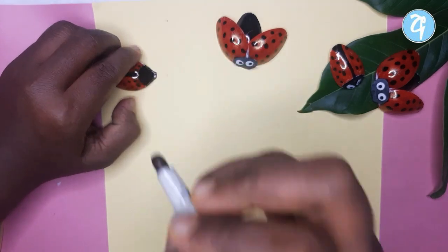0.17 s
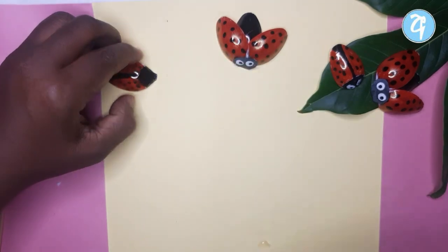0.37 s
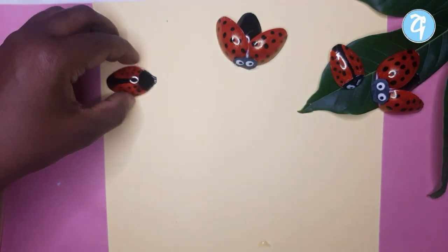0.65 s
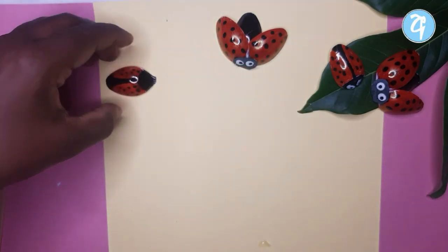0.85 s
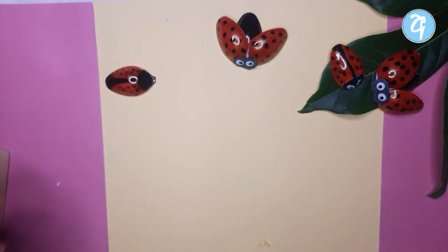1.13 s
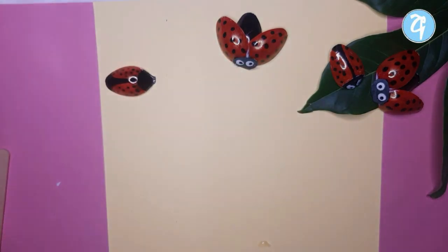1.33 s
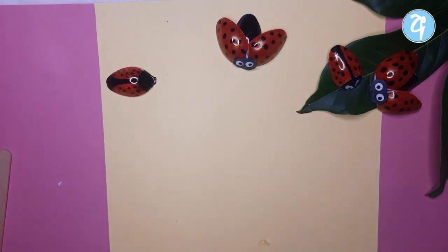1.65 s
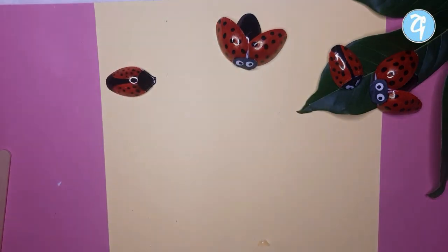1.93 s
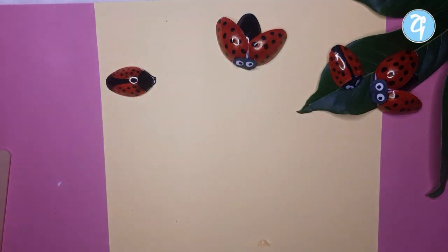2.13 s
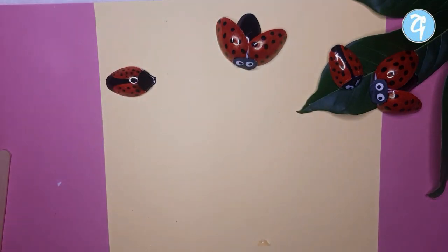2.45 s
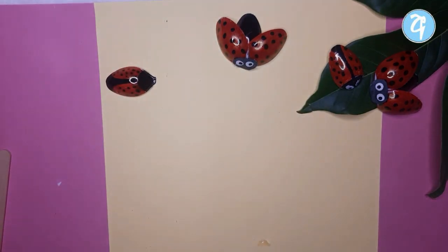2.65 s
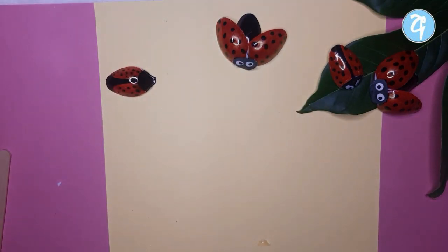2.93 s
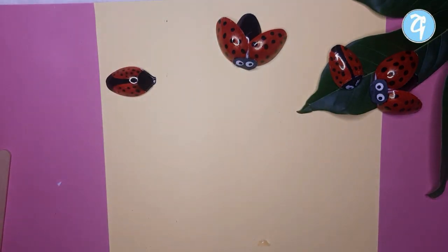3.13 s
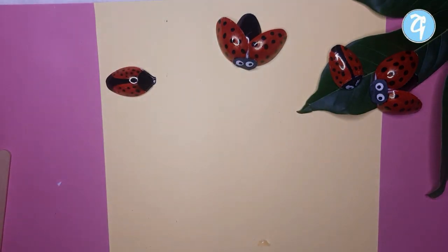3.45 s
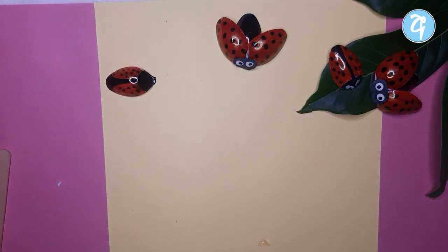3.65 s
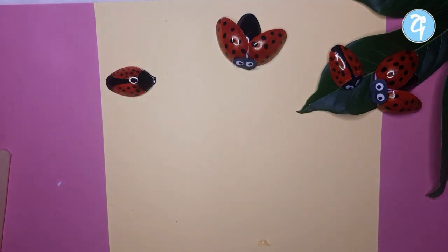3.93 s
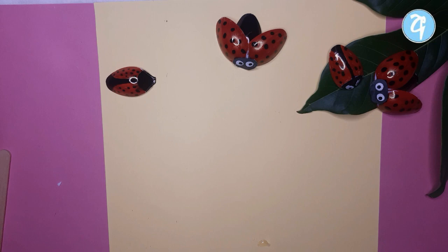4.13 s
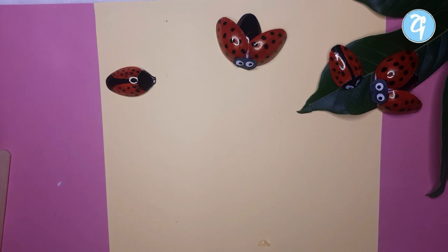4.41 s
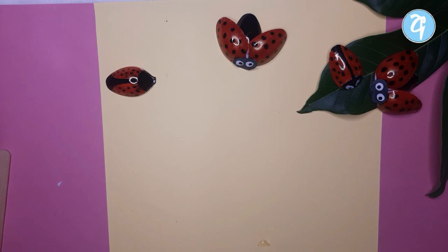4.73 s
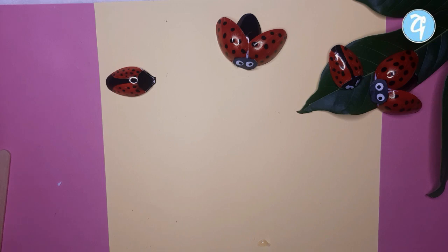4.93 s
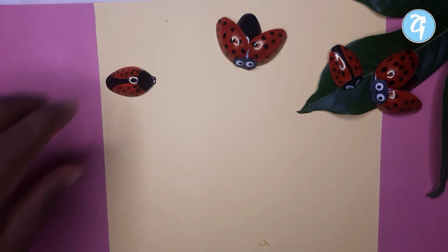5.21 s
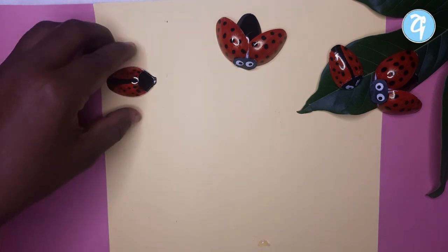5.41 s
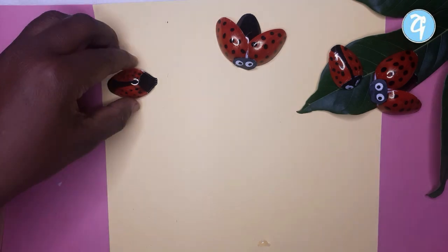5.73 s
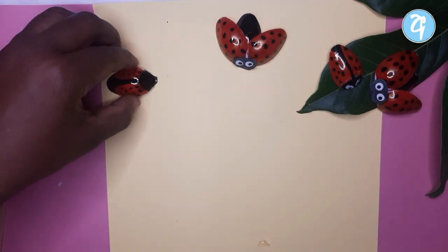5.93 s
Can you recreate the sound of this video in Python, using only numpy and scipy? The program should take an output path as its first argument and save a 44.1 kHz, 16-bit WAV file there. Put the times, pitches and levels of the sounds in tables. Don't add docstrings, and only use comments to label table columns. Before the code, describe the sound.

Close plastic ticks and a loud marker drop on a table, then a distant door slam ringing through an echoing room, with steady cricket chirps.

```python
import sys
import numpy as np
from scipy import signal
from scipy.fft import rfft, irfft
from scipy.io import wavfile
from scipy.ndimage import uniform_filter1d

SR = 44100
rng = np.random.default_rng(int(sys.argv[2]) if len(sys.argv) > 2 else 0)


def int16_out(signal):
    q = np.round(np.clip(np.atleast_2d(signal).T, -1, 1) * 32767)
    wavfile.write(sys.argv[1], SR, q.astype(np.int16))


def convert_level_to_amplitude(level_db):
    exponent = np.asarray(level_db, float) / 20
    return 10 ** exponent


N = 267229
TIME = np.arange(N) / SR

# frequency in Hz, level in dB.
AIR = [(30, 8), (60, -4.5), (300, -5), (500, 1), (800, 4.5), (1100, -5), (1700, -8), (2600, -7.5),
       (4000, -9), (6000, -4), (8000, -6.5), (11000, -9), (14000, -6.5), (15700, -11.5)]
# start in s, hold in s, floor level in dB, furniture level in dB.
RUMBLE = [(0, 0.0081, -71, -64), (.1, 0.079, -79, -87), (.33, 0.28, -83, -63.5), (1.34, 0.16, -80, -67),
          (1.72, .17, -89, -63), (2.24, .16, -73.5, -68), (2.85, 0.12, -75, -57.5), (3.1, 0.17, -80, -63),
          (3.7, 0.073, -73.5, -86), (3.9, 0.036, -66, -52.5), (4.08, 0.23, -72, -65), (5.1, 0.17, -58, -51),
          (5.54, 0.24, -79, -68)]
# frequency in Hz, level in dB.
WHINE = [(517, -78.5), (550, -80.5), (733.5, -68), (865, -83.5)]
# frequency in Hz, level in dB.
SPIKE_COLOUR = [(150, -21), (300, -13), (1000, 0.5), (2500, 1.5), (5000, 1.5), (8000, 0.5), (12000, 0),
                (15700, 2)]
# time in s, chirps counted so far.
CHIRPS = [(.054, 0), (1.13, 9), (1.825, 15), (2.668, 22), (3.146, 26), (3.722, 31), (4.82, 40), (6.0, 50)]
# time from its middle in s, level in dB.
STROKES = [
    (-.031, -3),
    (-.011, 0),
    (.008, -6),
]
# frequency in Hz, T60 in s.
ROOM_T60 = [(60, 1), (250, 0.85), (1000, 0.65), (2500, 0.68), (5000, 0.68), (12000, 0.6)]
# frequency in Hz, level in dB.
WALLS = [(400, 2), (1000, 4.5), (1700, -1.5), (3000, -5), (8000, -8.5)]
# time in s, panel in dB, latch in dB, boom in dB, crack in dB.
DOOR = [
    (2.025, -50.5, -65, -101, -71),
    (4.731, -50, -59, -66, -72),
    (4.7642, -20.5, -32.5, -45, -65),
    (4.919, -14, -12.5, -28.5, -32),
    (4.9679, -23.5, -46, -38.5, -63),
    (4.9711, -20, -18, -37, -33),
    (6.03, -58.5, -75, -69, -56.5),
]
# frequency in Hz, width in Hz, level in dB.
PANEL = [(373, 200, -8), (566, 35, -1.5), (805, 250, 13), (1020, 77, 10), (1325, 154, 8), (1740, 270, 5.5)]
# frequency in Hz, width in Hz, level in dB.
LATCH = [(1960, 190, 4), (2790, 250, 11), (3170, 200, 1), (4420, 250, -22)]
# frequency in Hz, level in dB, T60 in s.
BOOM = [(54.6, -20, 3.7), (93.7, 6, 0.92), (116.4, -4, 1.12), (162.6, 6.5, 0.34), (234, -1.5, 0.63),
        (309.7, -7.5, 0.76)]
# frequency in Hz, level in dB.
RATTLE = [(60, -8), (200, -3), (400, 0.5), (850, -2), (1500, -0.5), (2200, -12.5), (3300, -19.5),
          (15000, -46)]
# frequency in Hz, level in dB.
CLATTER = [(1000, -19.5), (1700, -10.5), (2400, -4.5), (3400, -10), (5000, -19), (8000, -23), (15000, -26)]
# time in s, peak in dB, frequency in Hz.
PINGS = [
    (2.625, -59, 1160),
    (6.03, -56, 1310),
]
# start in s, hold in s, level in dB.
SLEEVE = [(.575, .015, -58.5), (3.21, 0.059, -62), (3.715, .07, -62.5), (3.81, 0.19, -69),
          (4.155, .105, -67)]
# start in s, hold in s, level in dB.
SCUFF = [(0, 0.011, -56), (.08, 0.42, -60.5), (.56, 0.033, -59), (.63, 0.077, -68), (1.383, 0.038, -55),
         (2.18, 0.28, -68), (3.075, 0.018, -57.5), (3.13, 0.22, -68.5), (3.7, 0.17, -60.5),
         (3.92, .02, -47.5), (3.98, .1, -62), (4.13, 0.1, -60.5), (5.35, 0.09, -60.5), (5.47, 0.14, -62.5),
         (5.66, .3, -69.5), (6.03, 0.024, -63)]
# frequency in Hz, level in dB.
SCUFF_COLOUR = [(400, -1), (1200, -3), (2000, -7.5), (2600, -4), (3100, -2.5), (3800, -9), (5600, -9),
                (8000, -12.5), (15500, -27)]
# start in s, hold in s, level in dB.
RASP = [(.552, .012, -60), (.57, 0.013, -53), (.595, 0.012, -57), (1.385, 0.028, -63), (2.26, 0.027, -72),
        (3.085, 0.014, -77)]
# time in s, peak in dB, frequency in Hz.
THUMPS = [(2.184, -56, 178), (2.307, -51, 83.4), (2.892, -47, 126), (2.998, -50, 113), (3.242, -49, 61.5),
          (3.906, -25, 126), (3.948, -31, 87), (4.168, -47, 86.1), (4.248, -64, 62.4)]
# time in s, peak in dB, ring in Hz.
TICKS = [(0.05, -49, 3290), (0.0724, -45, 3320), (0.158, -44, 3180), (0.195, -41, 3350),
         (0.315, -44.5, 2640), (0.336, -41, 2920), (0.446, -45, 2340), (0.5188, -36.5, 2530),
         (0.5743, -34, 3000), (0.601, -37.5, 3470), (0.6305, -45, 3400), (0.705, -44, 3660),
         (1.3725, -58, 2860), (1.39, -53, 3000), (1.4135, -38, 3000), (2.6277, -50, 2680),
         (3.0697, -50, 2700), (3.094, -43, 2580), (3.1228, -45, 4840), (4.0305, -36, 2360),
         (4.045, -39, 2300), (4.1364, -46, 3150), (4.4894, -47.5, 3720), (5.3177, -40.5, 4120),
         (5.3447, -43, 4000), (5.352, -43.5, 4040), (5.42, -48, 1910), (5.453, -44, 2040),
         (5.528, -46, 2720), (5.5517, -43, 3410)]
# time in s, peak in dB, ring in Hz.
BOUNCES = [(0.0106, -45, 4100), (1.7647, -51, 3860), (3.789, -44, 2540), (3.922, -32, 5000),
           (3.935, -44, 3500)]
# time in s, peak in dB, shell ring in Hz,
# knock in dB and crack in dB (both relative to the peak).
TAPS = [
    [(1.3971, -24.5, 3260, -16.5, -32), (3.048, -34.5, 2700, -14.5, -15.5), (3.248, -47, 4060, -13, -9),
     (3.5659, -44.5, 1950, -5, -2), (3.7328, -36, 2840, -16, -27), (3.7554, -46, 2290, -9, -16),
     (3.9478, -36.5, 2420, -14, -5), (4.1165, -44.5, 2340, -9.5, -22), (4.2028, -58, 2470, -9, -6)],
    [(2.1675, -33.5, 3200, -34, -10), (3.906, -9, 2590, -16, -24)],
    [(2.3144, -35, 2700, -35, -14), (3.6358, -35.5, 2240, -7, 0.5), (3.704, -50, 2790, -13, -14)],
]
# frequency in Hz, level in dB.
EDGE = [(3000, -2), (5500, -10), (10000, -6), (13000, -10), (16500, -1)]
# frequency in Hz, level in dB.
CRINKLE = [(400, 9), (1000, 11.5), (1700, 7), (3000, 13.5), (5000, 0), (9000, -16), (15500, -12)]


def level(x, db):
    return x * convert_level_to_amplitude(db) / np.sqrt(np.mean(x ** 2))


def on_log(hz, table):
    table_hz, value = np.array(table).T
    return np.interp(np.log(np.maximum(hz, 1)), np.log(table_hz), value)


def colour(x, table):
    gain = convert_level_to_amplitude(on_log(np.fft.rfftfreq(len(x), 1 / SR), table))
    return irfft(rfft(x) * gain, len(x))


def band(x, lo_hz, hi_hz, order=2):
    edges = [lo_hz, min(hi_hz, 0.49 * SR)]
    return signal.sosfilt(signal.butter(order, edges, "bandpass", fs=SR, output="sos"), x)


def walk(rate):
    k = int(SR / rate)
    steps = np.repeat(rng.standard_normal(N // k + 1), k)
    return 1.3 * uniform_filter1d(uniform_filter1d(steps, k), k)[:N]


def gesture(rows, edge_db_s, column=2):
    attack, release = edge_db_s
    power = 0
    for row in rows:
        before = np.maximum(row[0] - TIME, 0)
        after = np.maximum(TIME - row[0] - row[1], 0)
        power = power + convert_level_to_amplitude(2 * (row[column] - attack * before - release * after))
    return np.sqrt(power)


def ring(hz, t60, rise=0.00031, length=0.08):
    t = np.arange(int(length * SR)) / SR
    return np.sin(2 * np.pi * hz * t) * (1 - np.exp(-t / rise)) * 1000. ** (-t / t60)


def crack(t60, table, rise=0.0001):
    t = np.arange(int(0.08 * SR)) / SR
    burst = colour(rng.standard_normal(len(t)), table) * (1 - np.exp(-t / rise)) * 1000. ** (-t / t60)
    return burst / np.abs(burst).max()


def click(table):
    pulse = np.zeros(int(0.08 * SR))
    pulse[int(0.01 * SR)] = 1
    pulse = colour(pulse, table)
    return pulse / np.sqrt(np.sum(pulse ** 2))


def add(bus, s, x):
    i = int(s * SR)
    bus[i:i + len(x)] += x[:N - i]


def room(x):
    t = np.arange(int(1.2 * SR)) / SR
    tail = np.zeros(len(t))
    for hz in 50 * 2 ** np.arange(0, 8.4, 1 / 3):
        noise = band(rng.standard_normal(len(t)), hz / 1.12, hz * 1.12, order=1)
        tail += noise * 1000. ** (-t / on_log(hz, ROOM_T60))
    tail *= 1 - np.exp(-t / 0.003)
    return signal.fftconvolve(x, tail / np.sqrt(np.sum(tail ** 2)))[:N]


def house():
    edge_db_s, rest = (96, 77), convert_level_to_amplitude(-81)
    floor = gesture(RUMBLE, edge_db_s, 2) + rest
    furniture = gesture(RUMBLE, edge_db_s, 3) + rest
    air = level(colour(rng.standard_normal(N), AIR), -64.5) * convert_level_to_amplitude(walk(4))
    low = level(band(rng.standard_normal(N), 32, 140), 0) * floor * convert_level_to_amplitude(2.0 * walk(26))
    mid = level(band(rng.standard_normal(N), 225, 375), 0) * furniture * convert_level_to_amplitude(-5.5 + 2.0 * walk(7.2))
    whine = np.zeros(N)
    for hz, db in WHINE:
        gain = convert_level_to_amplitude(db + 3.5 + 1.2 * walk(5.6))
        seconds = np.cumsum(1 + 0.0014 * walk(2.675)) / SR
        whine += gain * np.sin(2 * np.pi * hz * seconds)
    far_insects = level(band(rng.standard_normal(N), 14000, 14300), -90) * convert_level_to_amplitude(2.4 * walk(3.92))
    return air + low + mid + whine + far_insects


def spikes():
    rate_hz, duty = 137.33, 0.365
    turns = np.cumsum(rate_hz * (1 + 0.0012 * walk(3) + 0.0012 * walk(30))) / SR
    edges = np.zeros(N + 1)
    for offset, size in ((0, 1.), (duty, -0.9)):
        i = np.flatnonzero(np.diff(np.floor(turns - offset))) + 1
        late = ((turns[i] - offset) % 1) * SR / rate_hz
        edges[i] += size * late
        edges[i + 1] += size * (1 - late)
    return level(colour(edges[:N], SPIKE_COLOUR), -62.5)


def cricket():
    s, count = np.transpose(CHIRPS)
    bus = np.zeros(N)
    t = np.arange(int(0.011 * SR)) / SR
    for middle in np.interp(np.arange(51), count, s):
        echo = level(crack(0.06, EDGE), -31)
        echo[0] = 1
        for lag, db in STROKES:
            size, tune, slip = rng.standard_normal(3)
            hz = (7800 + 90 * tune) * (1 - 0.18 * t / t[-1])
            phase = 2 * np.pi * np.cumsum(hz) / SR
            note = np.sin(np.pi * t / t[-1]) ** 0.6 * (np.sin(phase) + 0.042 * np.sin(2 * phase))
            add(bus, middle + lag + 0.002 * slip, convert_level_to_amplitude(db + size) * signal.fftconvolve(note, echo))
    return level(bus, -64) + level(room(bus), -71)


def door():
    rings, rattle, direct, blows = np.zeros((4, N))
    for s, panel_db, latch_db, boom_db, crack_db in DOOR:
        contact = 0.00048 * convert_level_to_amplitude(0.56 * max(-16 - panel_db, 0))
        s += 0.001
        for modes, db in ((PANEL, panel_db - 0.5), (LATCH, latch_db + 1.5)):
            for hz, width, mode_db in modes:
                gain = convert_level_to_amplitude(db + mode_db + 0.64 * rng.standard_normal())
                add(rings, s, gain * ring(hz, 1.03 / width + 4 * contact, contact))
        add(rattle, s, convert_level_to_amplitude(panel_db - 0.5) * crack(0.025 + 8 * contact, RATTLE, contact))
        add(rattle, s, convert_level_to_amplitude(latch_db - 6) * crack(0.02 + 8 * contact, CLATTER, contact))
        add(blows, s - 0.008, convert_level_to_amplitude(panel_db + 9.5) * click(RATTLE) + convert_level_to_amplitude(latch_db + 7.5) * click(CLATTER))
        add(direct, s, convert_level_to_amplitude(crack_db + 14.0) * crack(0.011 + 4 * contact, EDGE, contact))
        for hz, db, t60 in BOOM:
            add(direct, s, convert_level_to_amplitude(boom_db + db - 4) * ring(hz, t60, 0.0083, 0.78))
    return rings, rattle, direct, blows


def far_pings():
    bus = np.zeros(N)
    for s, db, hz in PINGS:
        add(bus, s, convert_level_to_amplitude(db) * ring(hz, 0.09, 0.002))
    return bus


def sleeve():
    fibres = rng.standard_normal(N) * convert_level_to_amplitude(4.3 * walk(150))
    return level(band(fibres, 8500, 15500), 0) * gesture(SLEEVE, (550, 600))


def table_thumps():
    bus = np.zeros(N)
    for s, db, hz in THUMPS:
        add(bus, s, convert_level_to_amplitude(db - 4) * (ring(hz, 0.07, 0.0016, 0.3) + 0.5 * ring(1.33 * hz, 0.072, 0.0033, 0.3)))
    return bus


def rubbing():
    grains = rng.standard_normal(N) * convert_level_to_amplitude(3.0 * rng.exponential(size=N)) * convert_level_to_amplitude(3.0 * walk(200))
    rasp = level(band(grains, 2300, 5100, order=1), 0) * gesture(RASP, (900, 700))
    scuff = level(colour(grains, SCUFF_COLOUR), 0) * gesture(SCUFF, (500, 260))
    return rasp + scuff


def ticks():
    bus = np.zeros(N)
    for rows, crack_db in ((TICKS, -12), (BOUNCES, -6)):
        for s, db, hz in rows:
            shell = ring(hz, 0.0036) + 0.16 * ring(0.62 * hz, 0.002) + 0.42 * ring(1.37 * hz, 0.0022)
            add(bus, s, convert_level_to_amplitude(db + 8.0) * (shell + convert_level_to_amplitude(crack_db) * crack(0.0056, EDGE)))
    return bus


def taps():
    bus = np.zeros(N)
    for knock_hz, rows in zip((796, 1450, 1850), TAPS):
        for s, db, hz, knock_db, crack_db in rows:
            shell = ring(hz, 0.0022, 0.00016) + 0.1 * ring(0.78 * hz, 0.00093, 0.0012)
            shell += 0.59 * ring(1.3 * hz, 0.0016, 0.0001) + 0.13 * ring(2.36 * hz, 0.0026, 0.0001)
            knock = ring(knock_hz, 0.0055) + 0.54 * ring(1.23 * knock_hz, 0.0053)
            knock += 0.053 * ring(0.603 * knock_hz, 0.039)
            scatter = 0.073 * crack(0.027, CRINKLE, 0.00096)
            contact = convert_level_to_amplitude(crack_db + 2.5) * crack(0.01, EDGE)
            add(bus, s + 0.00026, convert_level_to_amplitude(db + 10.5) * (shell + scatter + convert_level_to_amplitude(knock_db + 5.0) * knock + contact))
    return bus


def scene():
    back = house() + cricket() + spikes()
    rings, rattle, direct, blows = door()
    direct = direct + far_pings()
    near = band(taps() + ticks() + rubbing(), 424, 20000)
    to_room = convert_level_to_amplitude(-17) * near + convert_level_to_amplitude(-29) * rings + convert_level_to_amplitude(5.0) * blows + convert_level_to_amplitude(-21) * direct
    wet = room(colour(to_room, WALLS))
    side = level(colour(rng.standard_normal(N), AIR), -80.5)
    side += convert_level_to_amplitude(-38.0) * np.roll(wet, 300) + convert_level_to_amplitude(-43) * band(near + direct, 6000, 16000)
    lean = np.array([[-0.5], [0.5]])
    close = near + table_thumps() + sleeve()
    far = rings + rattle + direct + wet
    return close * convert_level_to_amplitude(1.03 * lean) + far * convert_level_to_amplitude(0.88 * lean) + back * convert_level_to_amplitude(0.5 * lean) + 2 * lean * side


def roll_off(x):
    return signal.sosfilt(signal.butter(12, 16860, fs=SR, output="sos"), x)


def record(dry):
    bass_cut = signal.butter(3, 48, "highpass", fs=SR, output="sos")
    top_cut = signal.ellip(8, 0.3, 45, 15700, fs=SR, output="sos")
    mix = signal.sosfilt(np.vstack([bass_cut, top_cut]), dry)
    return roll_off(mix)


dry = scene()
out = record(dry)
int16_out(out)
```